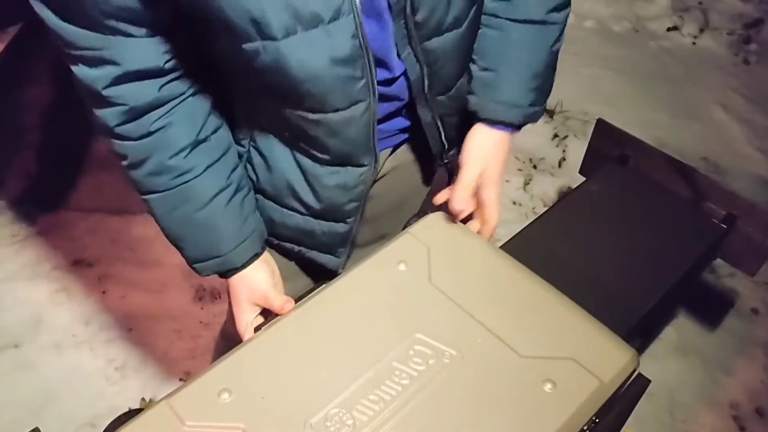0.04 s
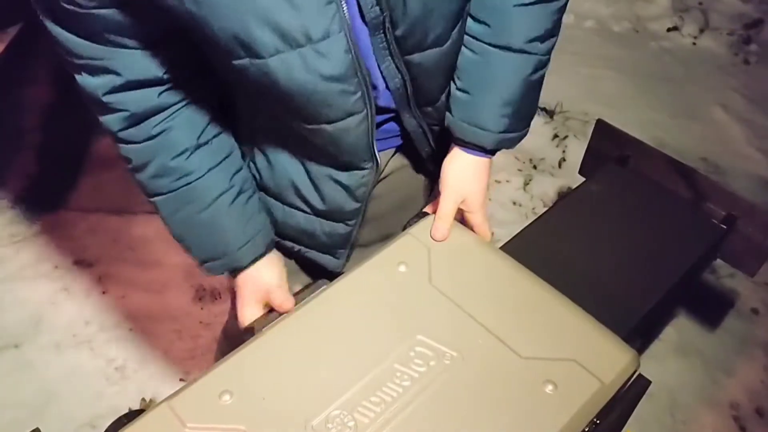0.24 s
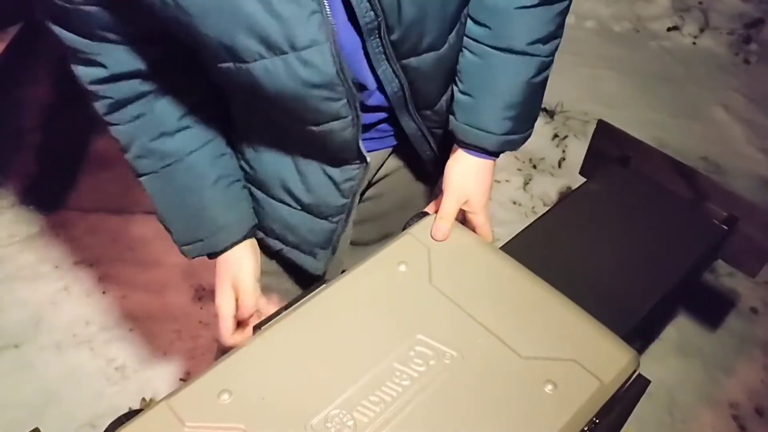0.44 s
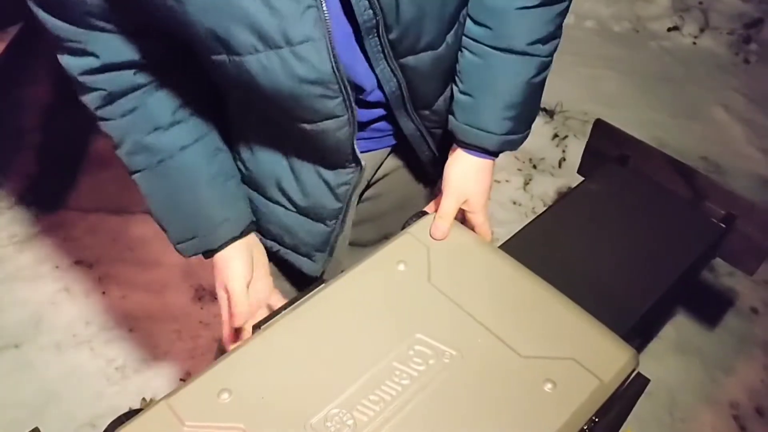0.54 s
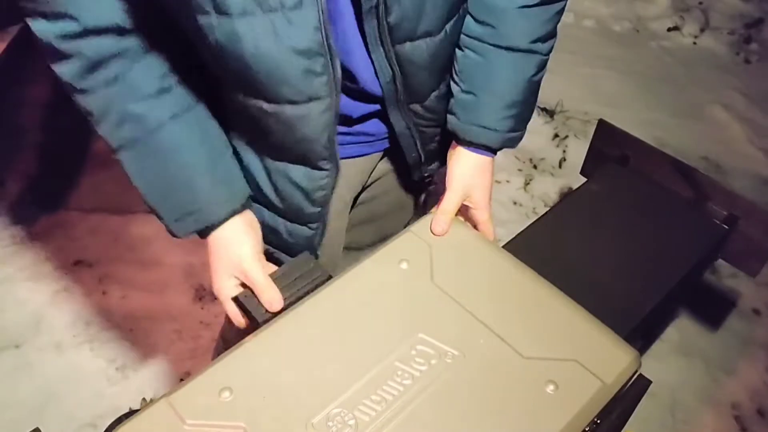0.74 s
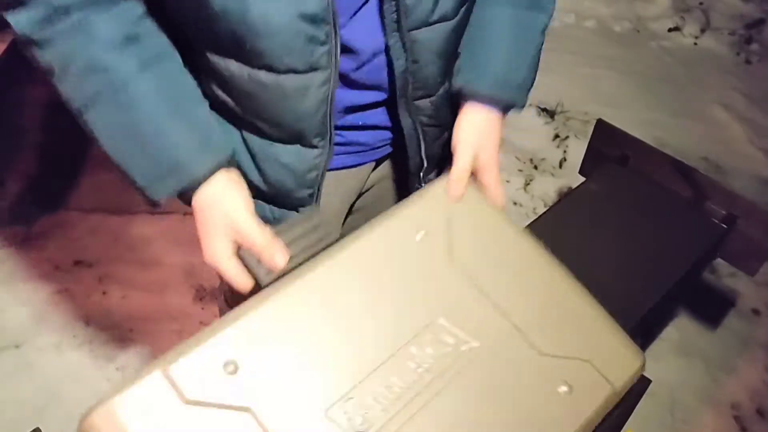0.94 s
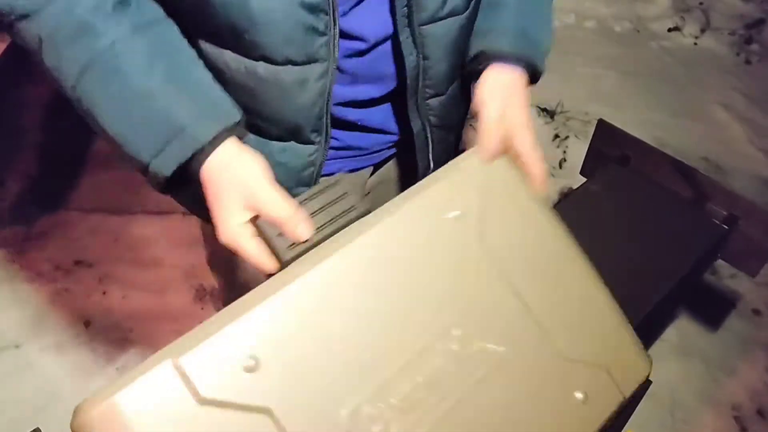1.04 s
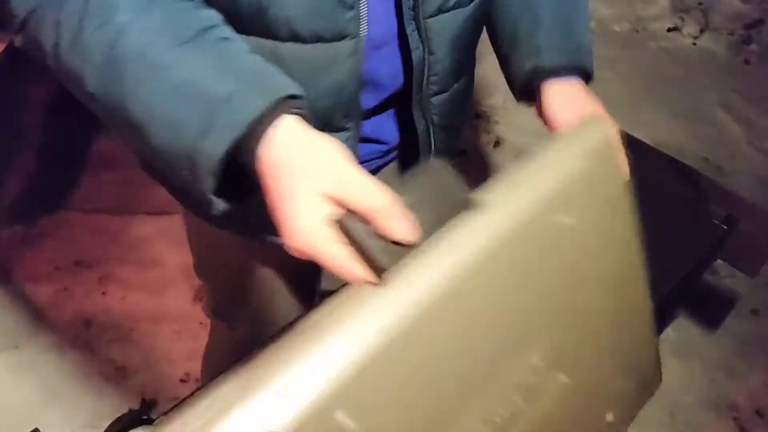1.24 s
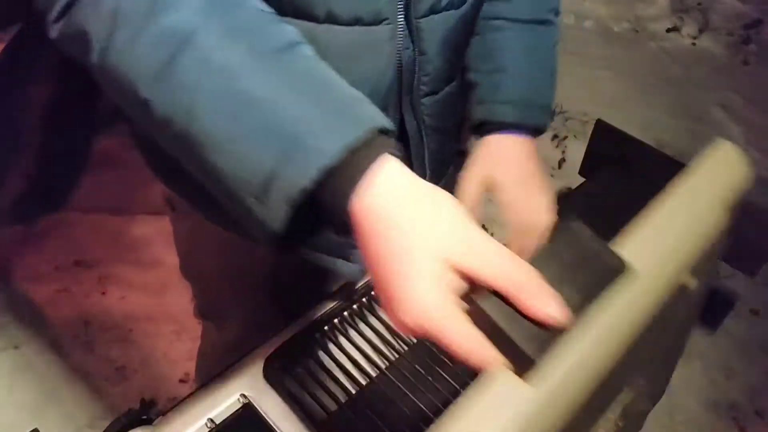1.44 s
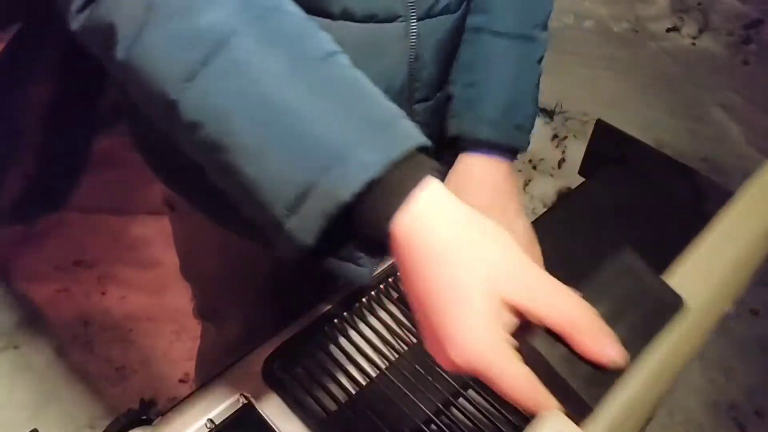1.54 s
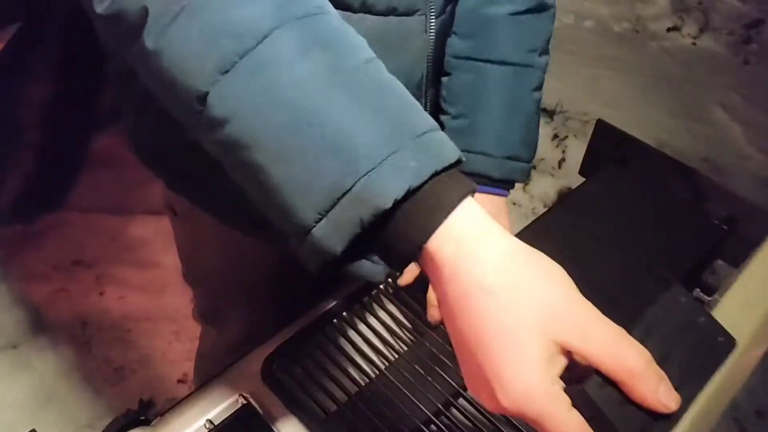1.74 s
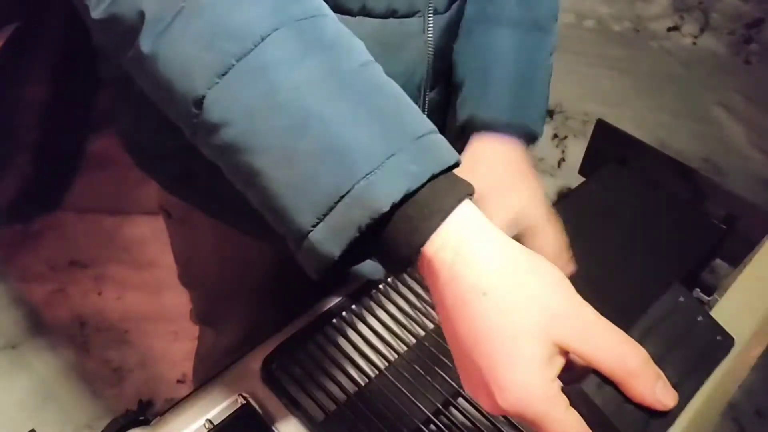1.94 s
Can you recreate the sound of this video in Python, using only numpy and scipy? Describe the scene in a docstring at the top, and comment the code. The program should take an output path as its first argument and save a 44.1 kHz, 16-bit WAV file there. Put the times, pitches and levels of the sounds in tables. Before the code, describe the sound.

Close up outdoors over a faint hiss, a case latch drags briefly and releases in two sharp hollow clacks; much quieter lid scraping, sleeve rustle, small clicks, a tiny squeak and dull bumps follow.

```python
"""Outdoors, close to the microphone, a portable gas grill is opened over a quiet, hissing background.
Its latch drags and snaps free with two loud clacks that ring the case. The lid unseats, scrapes and swings up,
the handle knocks and clicks, the hinge squeaks faintly and a padded sleeve brushes past.
Blows are shaped noise plus ringing tones, sliding is noise made of tiny slips, squeaks are wavering sines,
and the background is noise in bands."""
import sys
import numpy as np
from scipy import signal
from scipy.fft import rfft, irfft
from scipy.io import wavfile
from scipy.ndimage import uniform_filter1d

SR = 44100
rng = np.random.default_rng(int(sys.argv[2]) if len(sys.argv) > 2 else 0)


def put_to_file(sound):
    """Save the sound as 16-bit audio at rate SR, in the file named by the first command-line argument."""
    columns = np.atleast_2d(sound).T  # one column per channel
    safe = np.clip(columns, -1, 1)
    whole_steps = np.round(safe * 32767)
    wavfile.write(sys.argv[1], SR, whole_steps.astype(np.int16))


N = 88200
TIME = np.arange(N) / SR
BAND_EDGES_HZ = np.geomspace(28, 17000, 23)

# Blow tables give relative levels, before the shared colour and the ringing of the parts. Columns:
# start_s, thud_db, knock_db, clack_db, tick_db, sizzle_db, ring_length_factor, left_right_db
# The latch snaps free and chatters.
LATCH_BLOWS = [ (0.22, -33, -25, -33, -41, -46.5, 0.55, 8),
               (0.2254, -11, -3.5, -18.5, -11.5, -16, 0.77, 5.5),
               (0.2335, -18, -8.5, -26, -24.5, -31, 0.56, -3.5),
               (0.2480, -17.5, -16, -20.5, -31, -41, 0.64, 4),
               (0.2600, -26.5, -17.5, -31, -25.5, -37, 0.86, 6.5),
               (0.3105, -10, -11, -19, -14.5, -21.5, 0.82, 7), (0.3370, -27, -38, -28, -30.5, -33, 1.1, 1),
               (0.3620, -27.5, -39.5, -46, -44, -54.5, 1.3, 1),
               (0.4040, -32, -43, -59.5, -70, -73, 1.26, 8)]
# The lid unseats and bumps as it swings up: same columns.
LID_BLOWS = [ (0.5780, -28, -36.5, -59, -54, -55, 1.4, 3), (0.594, -33.5, -33.5, -56, -62, -58, 0.78, 6),
             (0.6191, -27, -34.5, -31, -38, -38, 1.65, 1.5), (0.6440, -47, -36, -35, -34, -34, 0.77, 1),
             (0.7150, -28.5, -32.5, -52, -41, -55, 1.37, 4), (0.779, -44, -47, -42.5, -47.5, -63, 1.6, 4),
             (0.84, -40, -50.5, -46.5, -46.5, -68, 0.88, 3.5), (0.9080, -47, -46, -79, -76, -69, 1.15, 6),
             (0.995, -50.5, -46, -58.5, -59, -60, 1.35, 10), (1.0549, -39, -48.5, -59, -56, -60, 0.84, 7),
             (1.1220, -41.5, -49.5, -54.5, -57, -79, 1.2, 7), (1.1820, -67, -53, -47, -46, -67, 0.87, -0.5)]
# The handle knocks and clicks: same columns.
HANDLE_BLOWS = [ (1.2580, -44.5, -36, -34.5, -57, -55, 1.46, 7),
                (1.2720, -44.5, -34.5, -43, -70, -70, 0.75, 7),
                (1.3180, -58, -43.5, -34, -38, -42, 0.81, 5.5),
                (1.4519, -58, -48.5, -38.5, -29.5, -44.5, 0.95, 5),
                (1.7264, -45, -49, -61.5, -77, -51, 0.91, 2),
                (1.7602, -41, -62, -51.5, -50.5, -61, 1.3, 11),
                (1.7972, -47, -48.5, -47, -37.5, -51.5, 1.3, 8), (1.8270, -49, -43, -53, -49.5, -65, 1, 3)]
# How alike the left and right sides are: pitch_hz, likeness (1 = the same)
LIKENESS = [(35, .6), (100, 1), (300, 0.97), (600, 0.89), (1100, 0.12), (3000, 0.13), (14000, 0.066)]


def from_db(db):
    """Turn decibels into gain."""
    return 10 ** (np.asarray(db) / 20)


def rms_one(x):
    """Scale a sound to an average strength (rms) of 1."""
    return x / np.sqrt(np.mean(x ** 2) + 1e-20)


def at_hz(points, hz):
    """Read a table between its points, on a log-frequency axis."""
    table_hz, values = np.transpose(points)
    return np.interp(np.log(hz), np.log(table_hz), values)


def waver(size):
    """Slow stereo chance of rms 1: noise averaged over `size` samples."""
    noise = rng.standard_normal((2, N))
    return rms_one(uniform_filter1d(noise, size=size, axis=1))


def strength(colour_db, pan_db, hz):
    """Left and right gain of a contact at one frequency, from its five levels and its left-right balance."""
    # centres of thud, knock, clack, tick and sizzle: pitch_hz
    colour_hz = [220, 560, 2000, 4800, 13000]
    # how much of the balance each pitch takes (negative swaps sides): pitch_hz, share
    pan_share = [(250, -0.36), (550, -1.1), (1100, -1.04), (2200, 0.59), (5000, 0.79), (14000, 1.15)]
    side_db = pan_db * at_hz(pan_share, hz) / 2
    level_db = at_hz(list(zip(colour_hz, colour_db)), hz)
    return from_db(level_db + np.array([[side_db], [-side_db]]))


def noise_bands(response=1):
    """Yield (centre in Hz, stereo noise of rms 1) band by band; the sides are less alike in the treble."""
    spectrum = rfft(rng.standard_normal((2, 2, N))) * response
    white = irfft(spectrum, N)
    for k, (low, high) in enumerate(zip(BAND_EDGES_HZ, BAND_EDGES_HZ[1:])):
        band_filter = signal.butter(2, [low, high], "band", fs=SR, output="sos")
        # neighbouring bands use separate noises
        mid, side = signal.sosfilt(band_filter, white[k % 2])
        hz = np.sqrt(low * high)
        alike = np.clip(at_hz(LIKENESS, hz), -.99, .99)
        stereo = np.sqrt(1 + alike) * mid + np.sqrt(1 - alike) * side * [[1], [-1]]
        yield hz, rms_one(stereo)


def crowded_resonances():
    """The uneven response of thin panels: a random gain for every frequency."""
    # size of the unevenness, a minus sign flips it: pitch_hz, spread_db
    ripple = [(100, -0.5), (1500, 2.5), (3500, 1.5), (6000, 3.5), (14000, -3)]
    ripple_width_hz = 55
    hz = np.arange(N // 2 + 1) * SR / N
    heights = np.clip(rng.standard_normal(2000), -2, 2)
    curve = np.interp(hz / ripple_width_hz, np.arange(len(heights)), heights)
    return from_db(at_hz(ripple, hz + 1) * curve)


def contact_noise(panels):
    """Noise bands with the panels' response and the colour that all contacts share."""
    # colour of the grill's body: pitch_hz, level_db
    body = [(35, -45), (70, -20.5), (120, -11.5), (170, -2.5), (240, -1.5), (340, -5.5), (480, 1), (650, 0),
            (900, -14.5), (1400, -2), (2000, -5), (3000, -2.5), (4200, -3), (5800, -5.5), (8200, -12),
            (11000, -5.5), (15000, -0.5)]
    return [(hz, from_db(at_hz(body, hz)) * noise) for hz, noise in noise_bands(panels)]


def ringing(blows, modes):
    """Each blow sets the modes (natural tones) of a part ringing; the two sides can be out of step."""
    mode_spread_db = 1
    out = np.zeros((2, N))
    chance_db = rng.normal(0, mode_spread_db, (len(blows), len(modes)))
    for k, (hz, db, t60) in enumerate(modes):
        clicks = np.zeros((2, N))
        for (s, *colour, _, pan), luck_db in zip(blows, chance_db):
            i = int(s * SR)
            clicks[:, i:i + 1] += strength(colour, pan, hz) * from_db(db + luck_db[k])
        # the less alike the sides are at this pitch, the later one side follows
        angle = np.arccos(np.clip(at_hz(LIKENESS, hz), -1, 1))
        lag = int(angle / (2 * np.pi * hz) * SR)
        clicks[k % 2] = np.roll(clicks[k % 2], lag)
        # a two-pole resonator turns each click into a dying sine
        decay = from_db(-60 / (t60 * SR))
        turn = 2 * np.pi * hz / SR
        start = [0, (-1) ** k * np.sin(turn)]
        feedback = [1, -2 * decay * np.cos(turn), decay * decay]
        out += signal.lfilter(start, feedback, clicks + 1e-18)
    return out


def air():
    """Quiet outdoor background: noise bands with a thin hiss, under a slowly changing level."""
    # background colour before the level changes: pitch_hz, level_db
    air_colour = [(35, -83.5), (80, -68), (160, -65), (215, -70), (300, -60), (550, -66), (850, -72.5),
                  (1350, -66.5), (2200, -73.5), (4500, -70), (8000, -85.5), (11000, -74), (15000, -69.5)]
    # added level, which dips around the loud clacks: time_s, level_db
    air_level = [(0, 5), (.22, -7.5), (.42, -12.5), (.55, -1), (.8, -1), (1.05, 3), (1.55, -2.5), (1.7, -6),
                 (2, -3)]
    steady = sum(from_db(at_hz(air_colour, hz)) * noise for hz, noise in noise_bands())
    return from_db(np.interp(TIME, *np.transpose(air_level))) * steady


def hinge():
    """A faint, rough, broken squeak as the lid reaches its stop: sines on a gliding, shaky pitch."""
    # path of the squeak before its roughness and partials: time_s, pitch_hz, level_db
    squeak = [(1.499, 1247, -51), (1.545, 1247, -57), (1.569, 1350, -55), (1.595, 1344, -60),
              (1.62, 1335, -56), (1.656, 1155, -73.5)]
    # overtones: multiple, level_db
    squeak_partials = [(1, 4), (2, -12), (3, -6.5), (4, -20)]
    roughness, flutter = 0.051, 0.45  # shares of the pitch and of the level
    s, hz, db = np.transpose(squeak)
    pitch_hz = np.interp(TIME, s, hz) * (1 + roughness * waver(size=60))
    phase = 2 * np.pi * np.cumsum(pitch_hz, axis=1) / SR
    tone = sum(from_db(level) * np.sin(round(k) * phase) for k, level in squeak_partials)
    loudness = np.interp(TIME, s, from_db(db), left=0, right=0)
    return tone * (1 + flutter * waver(size=300)) * loudness


def squeals():
    """The lid's rim drags and friction keeps one mode sounding for a moment: brief wavering sines."""
    # squeals: strongest_s, half_length_s, pitch_hz before the waver, level_db
    squeal_table = [(0.656, 0.036, 1299, -36.5), (.675, 0.038, 1062, -43), (0.706, 0.035, 885, -37.5),
                    (.795, 0.047, 1510, -49.5), (1.21, 0.028, 1517, -52), (1.185, 0.0082, 4690, -57)]
    waver_hz = 21
    out = np.zeros((2, N))
    for s, length, hz, db in squeal_table:
        phase = 2 * np.pi * np.cumsum(hz + waver_hz * waver(size=150), axis=1) / SR
        swell = np.exp(-((TIME - s) / length) ** 2)
        # both sides are in step at the strongest moment
        out += from_db(db) * swell * np.sin(phase - phase[:, [int(s * SR)]])
    return out


def rubbing(bands):
    """Latch, lid and sleeve slide in swells made of many tiny slips, each a short burst of noise."""
    # slides, levels before the shared colour and the overall level: strongest_s, rise_s, fall_s,
    # thud_db, knock_db, clack_db, tick_db, sizzle_db, left_right_db
    rubs = [ (0.025, 0.17, 0.074, -51, -49.5, -60, -57.5, -99, 10.5),
            (0.194, 0.054, 0.015, -45, -50, -54, -51.5, -64, 4),
            (0.224, 0.0079, 0.0047, -50, -26, -31, -25.5, -34, 9),
            (0.311, 0.017, 0.012, -20, -17.5, -21.5, -22.5, -27.5, 1),
            (0.429, 0.04, 0.08, -35, -46.5, -58, -73, -89, -4),
            (0.662, 0.038, 0.062, -31, -29.5, -35, -41.5, -54, 5),
            (0.738, 0.019, 0.015, -36, -52, -39.5, -47.5, -56, 1),
            (0.841, 0.092, 0.086, -55, -51.5, -58, -61, -61.5, 9.5),
            (1.120, 0.11, .16, -53, -51, -77, -86, -75, 10),
            (1.360, 0.072, 0.12, -62, -51.5, -51.5, -54, -64, 7.5),
            (1.455, 0.018, 0.044, -62, -46, -42, -40.5, -53, 1.5),
            (1.570, .05, .07, -66, -62, -55.5, -56.5, -60, 4),
            (1.812, 0.054, 0.067, -40.5, -41.5, -48.5, -45.5, -66, 3.5),
            (1.962, 0.032, 0.12, -49.5, -53.5, -54, -58, -104, 6.5)]
    slips_per_s, shortest_slip_s, slip_spread_db, overall_db = 600, 0.0044, 4, -8
    slip_sizes = from_db(slip_spread_db * np.minimum(rng.exponential(1, N), 3))
    slips = (rng.random(N) < slips_per_s / SR) * slip_sizes
    # power of each slide; rise and fall are the times for the sound to change by a factor e
    swells = np.array([np.exp(-2 * np.maximum((s - TIME) / rise, (TIME - s) / fall))
                       for s, rise, fall, *_ in rubs])
    out = np.zeros((2, N))
    for hz, noise in bands:
        # slips last longer in the lows
        keep = np.exp(-1 / (SR * (shortest_slip_s + 2 / hz)))
        grain = rms_one(signal.lfilter([1], [1, -keep], slips + 1e-18))
        gains = np.hstack([strength(row[3:-1], row[-1], hz) for row in rubs])
        out += np.sqrt(gains ** 2 @ swells) * grain * noise
    return from_db(overall_db) * out


def rocking():
    """The grill rocks under the hands in dull, low sines that swell briefly and die away."""
    # thumps, levels before the soft rise: start_s, pitch_hz, level_db
    thumps = [(0.247, 111.3, -14), (.400, 117, -46), (.728, 92, -32), (1.669, 88, -39.5),
              (1.745, 164, -38.5), (1.835, 103, -35.5)]
    rise_s, t60_s = 0.027, 0.18  # t60: time to fall by 60 dB
    out = np.zeros(N)
    for s, hz, db in thumps:
        t = np.maximum(TIME - s, 0)
        swell = from_db(db - 60 * t / t60_s) * (1 - np.exp(-t / rise_s))
        out += swell * np.sin(2 * np.pi * hz * t)
    return out


def shoved_panel(blows):
    """Each blow also shoves the panel under it, which rebounds for a few cycles."""
    # panel modes: pitch_hz, level_db, time_to_fall_60_db_s
    panel_modes = [(259.4, 0, 0.09), (556, -4, 0.022)]
    return ringing(blows, panel_modes)


def handle():
    """The handle's modes ring when it knocks and clicks."""
    # handle modes, before the overall level: pitch_hz, level_db, time_to_fall_60_db_s
    handle_modes = [(280.7, -9.5, 0.33), (336, -5, 0.25), (414.5, -7, 0.35), (563.3, -16, 0.45),
                    (653, -26, 0.44), (822, -10.5, 0.32), (1247, -10, 0.17), (1460, -9, 0.091),
                    (2010, -13, 0.11), (2690, -22, .16), (3030, -6.5, 0.098), (3437, -8, 0.067),
                    (3800, -12, 0.11), (5670, -8.5, 0.047), (5980, -14, 0.059)]
    return from_db(2.5) * ringing(HANDLE_BLOWS, handle_modes)


def lid():
    """The lid's modes ring as it unseats and bumps on its way up."""
    # lid modes, before the overall level: pitch_hz, level_db, time_to_fall_60_db_s
    lid_modes = [(91, -35, .45), (162, -20, 0.24), (190, -18, 0.082), (239, -10, .18), (291.8, -6, 0.37),
                 (317.2, -4.5, 0.22), (432, -17, 0.19), (508, -24, 0.2), (697, -37, 0.38), (893, -11, 0.18),
                 (1086, -28, 0.24), (1294, -6, 0.067), (1424, -6.5, 0.26), (1630, -11.5, .2),
                 (1720, -11, 0.082), (1920, -11, 0.14), (4620, -13.5, 0.16)]
    return from_db(1) * ringing(LID_BLOWS, lid_modes)


def case():
    """The latch's blows ring the modes of the case with its grate."""
    # case modes: pitch_hz, level_db, time_to_fall_60_db_s
    case_modes = [(132.6, -17.5, 0.24), (157.1, -17, .45), (200.9, -12, 0.23), (236.5, -3.5, 0.14),
                  (273, -14, 0.25), (315.3, -22, 0.61), (438.2, -15, 0.33), (489.3, -12.5, 0.15),
                  (537, -19, 0.2), (580, -10.5, 0.084), (630.7, -9, 0.13), (754.7, -16, 0.18),
                  (785, -38.5, .9), (1043, -16.5, 0.16), (1235, -34, 0.79), (1299, -11.5, 0.24),
                  (1516, -15.5, .16), (2028, -5.5, 0.11), (2620, -13, 0.11), (2830, -36, 0.51),
                  (2940, -8.5, 0.1), (3173, -13, 0.15), (3214, -14, 0.16), (4210, -12.5, 0.11)]
    return ringing(LATCH_BLOWS, case_modes)


def clatter(blows, bands):
    """Each blow is a short crack and a dense ring of noise; the lows build later."""
    # fall of the ring at length factor 1: pitch_hz, time_to_fall_60_db_s
    ring_fall = [(60, 0.39), (200, 0.21), (600, 0.15), (1500, 0.24), (4000, 0.14), (14000, 0.1)]
    ring_db, crack_db, crack_t60_s = -6.5, -12, 0.03
    contact_rise_s, build_cycles = 0.0017, 0.56
    out = np.zeros((2, N))
    t = TIME[:N // 4]
    for hz, noise in bands:
        power = np.zeros((2, N + len(t)))
        build = 1 - np.exp(-t / (contact_rise_s + build_cycles / hz))
        crack = from_db(crack_db - 60 * t / crack_t60_s)
        fall = -np.log(1000) * t / at_hz(ring_fall, hz)
        for s, *colour, length, pan in blows:
            i = int(s * SR)
            shape = build * (crack + from_db(ring_db) * np.exp(fall / length))
            power[:, i:i + len(t)] += (strength(colour, pan, hz) * shape) ** 2
        out += np.sqrt(power[:, :N]) * noise
    return out


def scene():
    """The grill's contacts over the background."""
    panels = crowded_resonances()
    blows = [*LATCH_BLOWS, *LID_BLOWS, *HANDLE_BLOWS]
    background = air()
    friction = hinge() + squeals() + rubbing(contact_noise(panels))
    knocks = rocking() + shoved_panel(blows) + clatter(blows, contact_noise(panels))
    return background + friction + knocks + handle() + lid() + case()


def record(dry):
    """Round the loudest peaks and cut the top of the treble."""
    ceiling, cutoff_hz = 1, 15900
    rounded = ceiling * np.tanh(dry / ceiling)
    top_cut = signal.ellip(10, .1, 80, cutoff_hz, fs=SR, output="sos")
    return signal.sosfilt(top_cut, rounded)


dry = scene()
out = record(dry)
put_to_file(out)
```